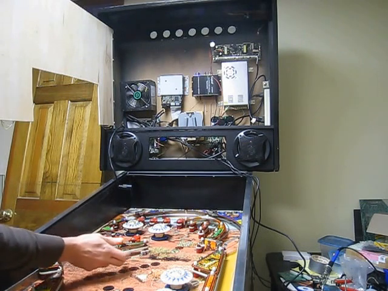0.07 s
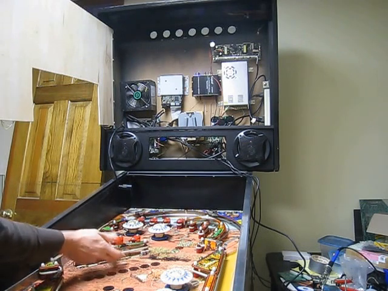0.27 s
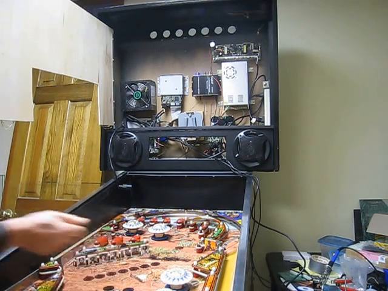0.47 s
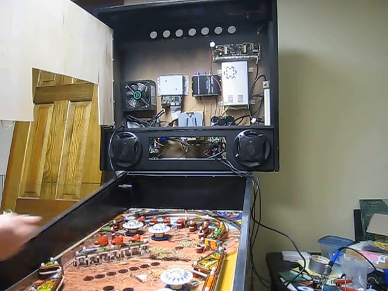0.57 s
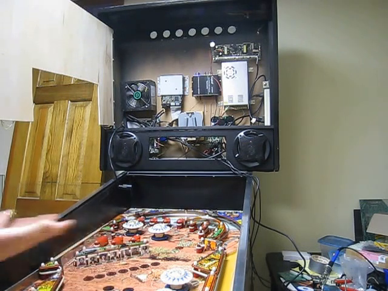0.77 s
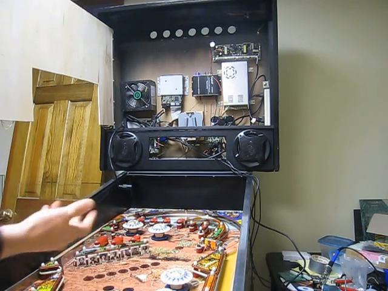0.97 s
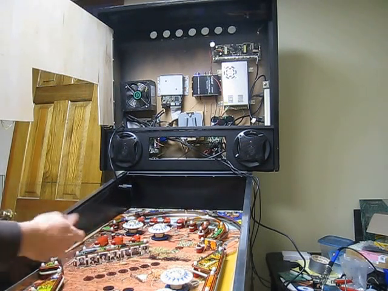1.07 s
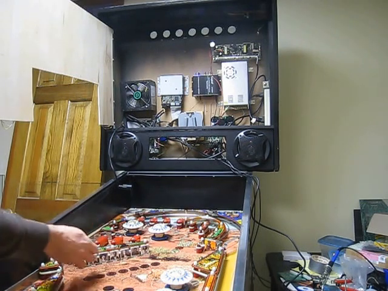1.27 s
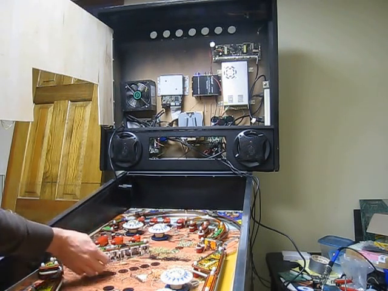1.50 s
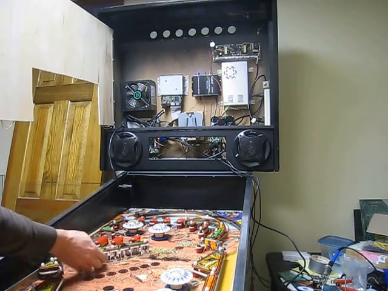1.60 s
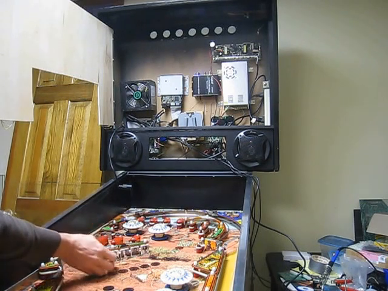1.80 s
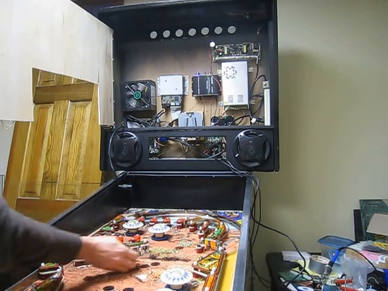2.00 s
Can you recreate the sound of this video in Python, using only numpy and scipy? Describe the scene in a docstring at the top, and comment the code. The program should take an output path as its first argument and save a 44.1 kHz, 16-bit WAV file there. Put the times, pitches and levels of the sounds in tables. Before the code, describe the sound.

Spring-loaded metal pinball targets clack down, close up in a small room. At 0.24 seconds one snaps, hits hardest with a woody knock at 0.33, and chatters until 0.5; the cabinet rumbles and a loose part jingles faintly, fading. A very faint two-tone whistle glides upward from 1.1. Sharp clacks follow at 1.37 and 1.62, rattling and ringing briefly over quiet fan hum with little deep bass.

```python
"""In a small room, close up, three spring-loaded metal targets of a pinball machine are knocked down by hand.
Each snaps free, lands and chatters: flurries of random clicks drive metal resonances, with single dying rings.
The first sets the wooden cabinet rumbling (noise in wood modes) and a loose part jingling (pulsed clicks).
A thin two-tone whistle glides up before the second target; fans hum (shaped noise) with a faint high tone.
The metal has a short room tail, and the microphone drops the deep bass."""
import sys
import numpy as np
from scipy import signal
from scipy.fft import rfft, irfft
from scipy.io import wavfile
from scipy.ndimage import uniform_filter1d

SR = 44100
rng = np.random.default_rng(int(sys.argv[2]) if len(sys.argv) > 2 else 0)


def inscribe(sig):
    """Save sig as 16-bit PCM at rate SR to the path in sys.argv[1].

    A 1-D sig is mono; a 2-D sig holds one channel per row.
    Samples are clipped to [-1, 1] before scaling.
    """
    pcm = np.round(np.clip(np.atleast_2d(sig).T, -1, 1) * 32767)
    wavfile.write(sys.argv[1], SR, pcm.astype(np.int16))


N = 90404
TIME = np.arange(N) / SR

# One table per target, each row a flurry of clicks: (start [s], rise [s], level [dB], t60 after the rise [s],
# bass relative to middle [dB], treble relative to middle [dB])
TARGET_FLURRIES = [
    [(.2375, 0.0045, -17.5, 0.016, -1, 8.5), (.243, 0.0025, -13, 0.015, -8.5, -14),
     (.25, 0.014, -26.5, 0.23, 5, 2.5), (.284, 0.021, -27.5, 0.076, 6.5, 2),
     (.3068, 0.00081, -15, 0.082, 4.5, 1.5), (.318, 0.0071, -20.5, 0.14, -18, 4.5),
     (.3287, 0.00043, -9, 0.024, 6, -0.5), (.345, 0.019, -29, 0.38, -23, -1),
     (.383, 0.0057, -27, 0.32, -24, -6), (.441, 0.0021, -25.5, 0.23, -20, -2),
     (.465, 0.0024, -30, 0.14, -16, 2), (.49, 0.0042, -33, 0.38, -20, -2)],
    [(1.366, 0.013, -15, 0.038, -9, 0.5), (1.386, 0.0075, -28, 0.75, 7, -6),
     (1.444, 0.0019, -21.5, 0.25, -4, 1), (1.455, 0.013, -21.5, 0.1, -14, 0.5),
     (1.48, 0.0074, -25.5, 0.076, -4, -0.5), (1.503, 0.0057, -32.5, 0.083, 8, -16)],
    [(1.617, 0.0049, -24, 0.076, -22, 7.5), (1.623, 0.00067, -19.5, 0.037, -14, 5),
     (1.635, 0.0055, -27, 0.39, 3, 1), (1.675, .001, -24, 0.018, -1, -3),
     (1.678, 0.001, -17.5, 0.033, -9, 6), (1.686, 0.0052, -26, 0.1, -21, 5),
     (1.708, 0.0051, -22.5, 0.15, -3, 7), (1.73, 0.012, -30.5, 0.18, -1, -1),
     (1.77, 0.0088, -34.5, 0.23, 2.5, -1.5)],
]
# Resonances of each metal target: (frequency [Hz], width [Hz], relative level [dB])
FIRST_RING = [(437, 49, -7), (1310, 88, 1), (1732, 97, 8), (2790, 250, 7), (4170, 170, 3), (2454, 30, -2),
              (6770, 49, -3), (7100, 100, -10), (9350, 53, -7), (11000, 110, -14), (10400, 31, -9),
              (3440, 75, -3)]
SECOND_RING = [(670, 17, 4), (1270, 200, 9), (1640, 17, -1), (3320, 21, 1), (2870, 50, -10), (4442, 50, 7),
               (6350, 140, 7.5), (7210, 97, 2), (9320, 73, 3), (11000, 39, -13), (12020, 54, -13)]
THIRD_RING = [(1275, 120, 4), (1760, 19, -6), (2470, 61, -8.5), (3460, 32, -5), (4230, 40, 1.5),
              (5100, 38, -9), (5790, 39, -6), (6550, 35, -4), (7180, 100, 1.5), (7600, 44, -6),
              (8130, 230, -10), (9500, 220, -11), (10800, 71, -12), ]
# Strength of the resonances beside the bare clicks, one per target: (level [dB])
TARGET_RING_DB = [-9.5, -8.5, -6.5]
# Spectrum of a bare click: (frequency [Hz], relative level [dB])
CLICK_SPECTRUM = [(35, -63), (60, -16), (301, -4), (1110, -8), (1280, 0), (2000, -4), (5090, -5.5),
                  (5860, -7), (11000, -9.5), (16000, -17.5)]
BASS_HZ, TREBLE_HZ = 880, 5160  # bass lies below the first, treble above the second


def target(flurries, modes, ring_db):
    """Metal clatters: flurries of clicks rise and die, heard bare and through the target's resonances."""
    power = np.zeros((3, N))
    for start, rise, db, t60, bass_db, treble_db in flurries:
        t = TIME - start
        rise = max(rise, 2e-4)
        decay = gain_of(db - 60 * np.maximum(t - rise, 0) / t60)
        shape = np.clip(t / rise, 0, 1) * decay
        power += (shape * gain_of([[bass_db], [0], [treble_db]])) ** 2
    bass, middle, treble = np.sqrt(power) * clicks()
    low = signal.butter(2, BASS_HZ, fs=SR)
    high = signal.butter(2, TREBLE_HZ, "high", fs=SR)
    # swap the middle's bass and treble for their own strengths
    drive = middle + signal.lfilter(*low, bass - middle) + signal.lfilter(*high, treble - middle)
    return coloured(drive, CLICK_SPECTRUM) + gain_of(ring_db) * ringing(drive, modes)


# Single clear rings that stand out of the clatter:
# (start [s], frequency [Hz], level [dB], t60 [s])
CLEAR_RINGS = [(.241, 2606, -19, 0.14), (.241, 5890, -13, 0.032), (.242, 7760, -13, 0.056),
               (.284, 6150, -21, 0.067), (.295, 6490, -16.5, 0.16), (.308, 436, -17.5, 0.13),
               (.334, 447.6, -18.5, .15), (.33, 1230, -8, 0.018), (.447, 441, -24, 0.45),
               (.445, 2424, -31.5, 0.57), (.494, 330, -28, .35), (.455, 9260, -32.5, 0.29),
               (1.378, 618, -25, 0.37), (1.378, 2410, -22, 0.16), (1.377, 1610, -21, 0.096),
               (1.386, 948, -21, 0.1), (1.446, 2830, -26.5, 0.086), (1.456, 1290, -23, 0.22),
               (1.465, 1614, -23, 0.24), (1.624, 6770, -12.5, 0.031), (1.624, 1668, -23, .1),
               (1.626, 4290, -21.5, 0.085), (1.628, 6300, -21.5, 0.11), (1.624, 2815, -15.5, 0.073),
               (1.679, 10930, -25, 0.14), (1.679, 5840, -17, 0.21), (1.712, 1287, -22, 0.13),
               (1.714, 7500, -25, 0.18), (1.714, 9780, -26.5, 0.27), (1.678, 2830, -24, 0.08),
               (1.68, 928, -25, 0.11), (1.712, 3450, -30.5, .25)]
RING_ROUGHNESS, ROUGH_SPEED = 0.82, 0.031  # share of noise at the start; its bandwidth per Hz of pitch
CHATTER_S = 0.26  # noise share falls to 1/e in this time


def pings():
    """Metal rings are roughened while parts chatter in contact, then turn clean."""
    return struck(CLEAR_RINGS, RING_ROUGHNESS, ROUGH_SPEED, CHATTER_S)


# Dull knocks on wood: (start [s], frequency [Hz], level before the low cut [dB], t60 [s])
WOOD_KNOCKS = [(.3288, 612, -4, 0.016), (.3311, 614, -5.5, 0.013), (.3075, 376, -16.5, 0.051)]


def thumps():
    """Wood answers a knock with short, clean dying tones."""
    return struck(WOOD_KNOCKS, 0, ROUGH_SPEED, CHATTER_S)


WAVER, WAVER_SPEED = 0.25, 0.012  # lasting noise share; its bandwidth per Hz of pitch
# A thin free ring of the last target: (start [s], frequency [Hz], level [dB], t60 [s])
FREE_RING = [(1.68, 1713, -40, 1.15)]


def late_ring():
    """The last target rings on freely as one slowly dying, wavering tone."""
    return struck(FREE_RING, WAVER, WAVER_SPEED, np.inf)


# Modes of the wooden cabinet: (frequency [Hz], relative level [dB], t60 [s])
CABINET_MODES = [(106, 0, .8), (169, -5, 2.1), (284.4, 4, 2.4), (332, 1, 2.6), (417, 0, 2.35),
                 (488.5, -0.5, 2.9), (680, -5.5, 1.7), (878, -4.5, 2.9), (950, -5, 1.5), (1314, -5.5, 1.8),
                 (1400, -7, 2.3), (1848, -7, 1.5)]
# Strength of the shaking in those modes: (time [s], level [dB])
RUMBLE_LEVEL = [(0.362, -35), (0.4, -37), (0.468, -29.5), (0.612, -45), (0.888, -53.5), (0.91, -50),
                (1.34, -55.5)]
RUMBLE_WIDTH_HZ, RUMBLE_WASH_DB = 6.4, -1  # mode width; broad noise relative to the modes
KNOCK_S, KNOCK_DB = 0.45, -39.5


def rumble():
    """The cabinet rings on after a hard knock and keeps being shaken: noise in the same modes."""
    s, db = np.transpose(RUMBLE_LEVEL)
    noise = rng.standard_normal((2, N))
    wash_band = signal.butter(2, [210, 1010], "band", fs=SR)
    wash = evened(signal.lfilter(*wash_band, noise[1]))
    shaken_modes = [(hz, RUMBLE_WIDTH_HZ, mode_db) for hz, mode_db, _ in CABINET_MODES]
    shaken = ringing(noise[0], shaken_modes) + gain_of(RUMBLE_WASH_DB) * wash
    knocks = [(KNOCK_S, hz, KNOCK_DB + mode_db, t60) for hz, mode_db, t60 in CABINET_MODES]
    knocked = struck(knocks, WAVER, WAVER_SPEED, np.inf)
    return knocked + shaken * gain_of(np.interp(TIME, s, db, left=-120))


# Resonances of the loose metal part:
# (frequency [Hz], width before the shared addition [Hz], relative level [dB])
JINGLE_MODES = [(1310, 9, 8.5), (2420, 10, 3), (3326, 20, -2), (4440, 66, 4.5), (6200, 190, -11),
                (7340, 20, 4), (7840, 39, -10), (8200, 23, -2), (9720, 30, 3), (11300, 20, -2),
                (12400, 65, 1), (13300, 60, 0), (13700, 45, -5), (14900, 26, -4)]
ADDED_WIDTH_HZ = 34  # added to every width: the loose part's rings are short and blurred
JINGLE_S, JINGLE_DB, JINGLE_T60 = 0.615, -49, 2.5  # time of a swing peak [s], level there, t60 [s]
SWING_HZ, SWING_DB = 13.25, 3.5  # swing rate; rise and dip of the level about its mean
JINGLE_END_S, JINGLE_FADE_DB_PER_S = 0.82, 60  # extra fade from here on
JINGLE_DRY_DB = 4  # bare clicks relative to the resonances


def jingle():
    """A loose metal part swings and buzzes at each swing, dying away."""
    t = TIME - JINGLE_S
    swing_db = SWING_DB * np.cos(2 * np.pi * SWING_HZ * t) - 60 * abs(t) / JINGLE_T60
    fade_db = JINGLE_FADE_DB_PER_S * np.maximum(TIME - JINGLE_END_S, 0)
    started = t > -0.05
    drive = clicks() * gain_of(JINGLE_DB + swing_db - fade_db) * started
    modes = [(hz, ADDED_WIDTH_HZ + width, db) for hz, width, db in JINGLE_MODES]
    return ringing(drive, modes) + gain_of(JINGLE_DRY_DB) * coloured(drive, CLICK_SPECTRUM)


# Course of the lower whistle tone: (time [s], frequency [Hz], level before flutter and smoothing [dB])
WHISTLE_GLIDE = [(1.075, 10400, -64), (1.115, 10200, -66), (1.13, 10150, -85), (1.155, 10240, -68),
                 (1.175, 10340, -60), (1.235, 11600, -63), (1.253, 12100, -54.5), (1.287, 12430, -60),
                 (1.337, 12280, -54), (1.359, 12030, -62), (1.365, 11880, -56)]
UPPER_RATIO, UPPER_DB = 1.36, -3  # upper tone relative to the lower
FLUTTER_DB = 3  # RMS


def whistle():
    """Two thin tones glide up together and sag at the end, their level fluttering at random."""
    s, hz, db = np.transpose(WHISTLE_GLIDE)
    pitch = uniform_filter1d(np.interp(TIME, s, hz), size=1200)
    phase = 2 * np.pi * np.cumsum(pitch) / SR
    flutter = evened(uniform_filter1d(rng.standard_normal(N), size=250))
    level = np.sqrt(2) * gain_of(np.interp(TIME, s, db, -120, -120))
    level *= gain_of(FLUTTER_DB * flutter)
    tones = np.sin(phase) + gain_of(UPPER_DB) * np.sin(UPPER_RATIO * phase)
    return uniform_filter1d(level, size=300) * tones


# Spectrum of the fans: (frequency [Hz], relative level per Hz [dB])
FAN_SPECTRUM = [(12, -42), (20, -13), (104, -9.5), (150, -4), (923, -9.5), (1260, -10), (1440, -16),
                (1660, -7), (1810, -12), (2910, -13.5), (7950, -20.5), (16000, -26.5)]
HUM_DB = -52  # RMS
TONE_HZ, TONE_DB = 7875, -64  # RMS


def hum():
    """Fans make steady shaped noise, with a narrow high tone."""
    hz = np.fft.rfftfreq(N, 1 / SR)
    spectrum = rfft(rng.standard_normal(N)) * gain_of(read(FAN_SPECTRUM, hz))
    wash = irfft(spectrum, N)
    tone = np.sin(2 * np.pi * TONE_HZ * TIME)
    return gain_of(HUM_DB) * evened(wash) + gain_of(TONE_DB) * evened(tone)


# Decay of the small room: (frequency [Hz], t60 [s])
ROOM_DECAY = [(200, 0.16), (1500, 0.087), (6000, 0.11), (15000, 0.062)]
ROOM_DB = -13.5  # relative to the direct sound


def room(x):
    """Walls return a tail of noise, each band dying at its own speed."""
    n = np.arange(SR // 2)
    taps = rng.standard_normal(SR // 2) * (n > 200)  # gap before the first reflection
    hz, t, bands = signal.stft(taps, SR, nperseg=256)
    decay = gain_of(-60 * t / read(ROOM_DECAY, hz)[:, None])
    tail = signal.istft(bands * decay, SR, nperseg=256)[1]
    return signal.fftconvolve(x, tail / np.linalg.norm(tail))[:N]


CLICKS_PER_S, CLICK_SPREAD_DB = 9000, 1.5


def clicks():
    """Dense clicks of random time, sign and size, at power 1."""
    size = gain_of(CLICK_SPREAD_DB * np.minimum(rng.exponential(1, N), 4))
    sign = rng.choice([-1., 1.], N)
    happens = rng.random(N) < CLICKS_PER_S / SR
    return evened(size * sign * happens)


PING_RISE_S = 0.0015  # longest rise
SHAKE_HZ = 38.7  # added chatter bandwidth, scaled by the roughness


def struck(rows, rough, speed, lasts):
    """Dying tones whose height and phase are shaken by contact, each at most a second long."""
    out = np.zeros(N)
    for s, hz, db, t60 in rows:
        start = round(s * SR)
        t = np.arange(min(N - start, SR)) / SR
        a, b = rng.standard_normal((2, SR))[:, :len(t)]
        r = np.exp(-np.pi * (speed * hz + SHAKE_HZ * rough) / SR)
        shake = signal.lfilter([np.sqrt((1 - r * r) / 2)], [1, -r], a + 1j * b)
        share = np.clip(rough, 0, 1) * np.exp(-(t / lasts) ** 2)
        tone = ((1 - share + share * shake) * np.exp(2j * np.pi * hz * t)).imag
        rise = np.minimum(t / min(PING_RISE_S, t60 / 40), 1)
        out[start:start + len(t)] += rise * gain_of(db - 60 * t / t60) * tone
    return out


def ringing(x, modes):
    """Bank of resonances; noise of power 1 comes out with about power 1."""
    out = np.zeros(N)
    for hz, width, db in modes:
        r = np.exp(-np.pi * width / SR)
        pole = r * np.exp(2j * np.pi * hz / SR)
        ring = signal.lfilter([1], [1, -pole], x + 0j).imag
        out += gain_of(db) * np.sqrt(2 * (1 - r * r)) * ring
    return out / np.sqrt(sum(gain_of(2 * db) for _, _, db in modes))


def coloured(x, spectrum):
    """Short filter with the shape of the given spectrum and unit energy."""
    gain = gain_of(read(spectrum, np.fft.rfftfreq(1024, 1 / SR)))
    # squared, since the minimum-phase step takes the root of the response
    even_taps = signal.firwin2(1023, np.linspace(0, 1, 513), gain ** 2)
    taps = signal.minimum_phase(even_taps)
    return signal.oaconvolve(x, taps / np.linalg.norm(taps))[:N]


def read(points, hz):
    """Read a table of values between its points, along log frequency."""
    f, value = np.transpose(points)
    return np.interp(np.log(hz + 1), np.log(f + 1), value)


def gain_of(db):
    """Amplitude factor of a level in dB."""
    return 10 ** (np.asarray(db) / 20)


def evened(x):
    """Scale to power 1."""
    return x / np.sqrt(np.mean(x ** 2) + 1e-20)


LOW_CUT_HZ = 225


def scene():
    """The metal with its room tail, over the cabinet, whistle and fans."""
    rings = [FIRST_RING, SECOND_RING, THIRD_RING]
    clatter = sum(target(*parts) for parts in zip(TARGET_FLURRIES, rings, TARGET_RING_DB))
    clatter += jingle() + thumps()
    low_cut = signal.butter(3, LOW_CUT_HZ, "high", fs=SR, output="sos")
    metal = signal.sosfilt(low_cut, clatter) + pings() + late_ring()
    rest = rumble() + whistle() + hum()
    return (metal + gain_of(ROOM_DB) * room(metal) + rest)[None]


MIC_LOW_HZ, EDGE_HZ = 60.6, 15750  # lower and upper limits


def record(dry):
    """The microphone drops the deep bass; a steep filter limits the treble."""
    thin = signal.lfilter(*signal.butter(2, MIC_LOW_HZ, "high", fs=SR), dry)
    band_limit = signal.firwin(511, EDGE_HZ, window=("kaiser", 9), fs=SR)
    return signal.oaconvolve(thin, band_limit[None], "same")


dry = scene()
out = record(dry)
inscribe(out)
```